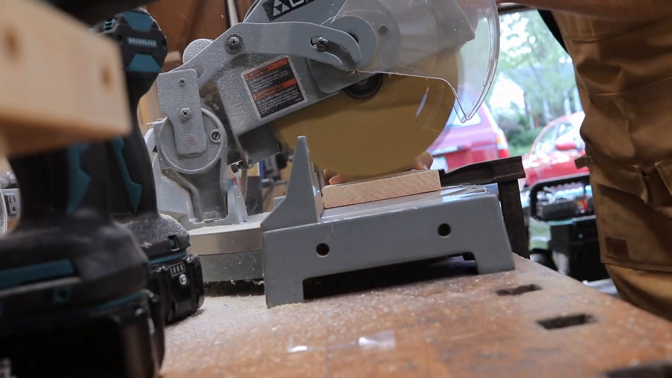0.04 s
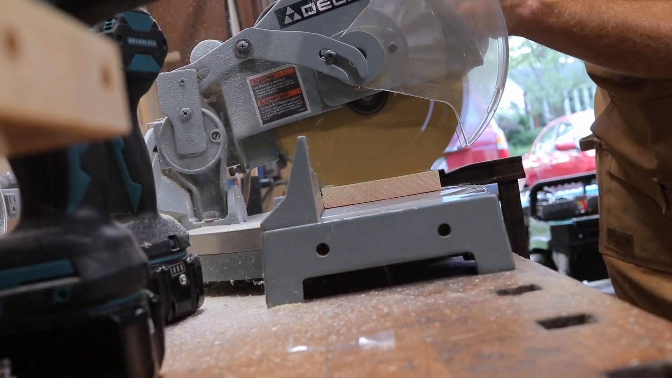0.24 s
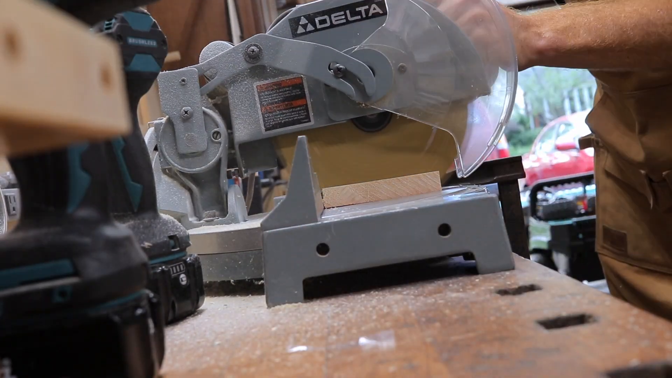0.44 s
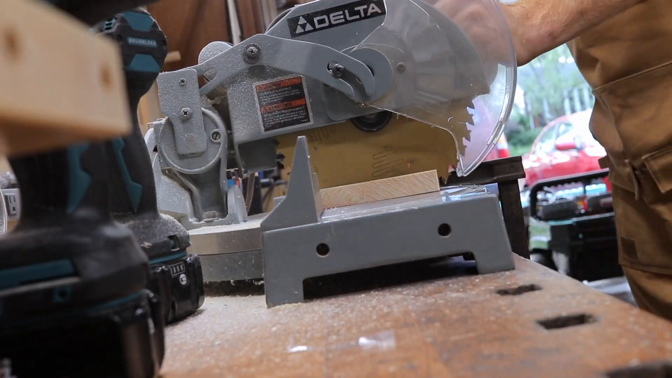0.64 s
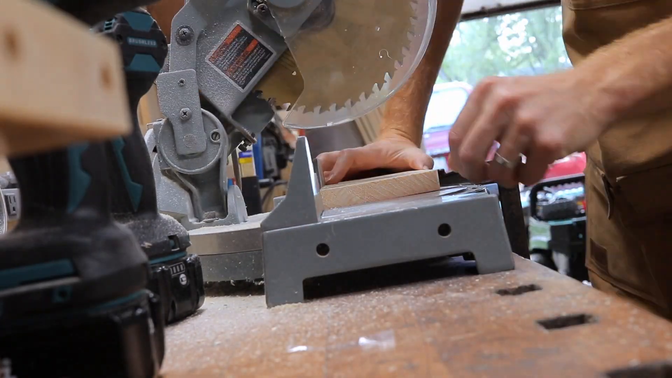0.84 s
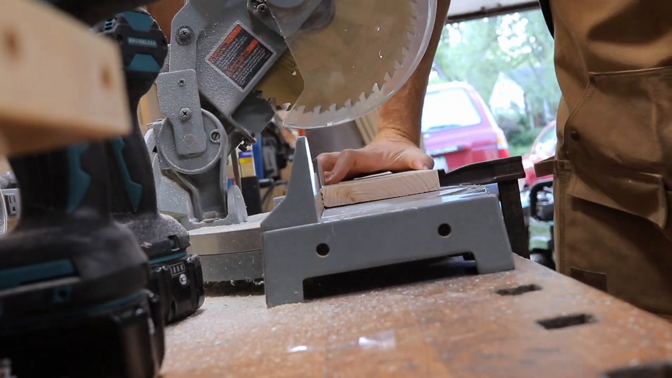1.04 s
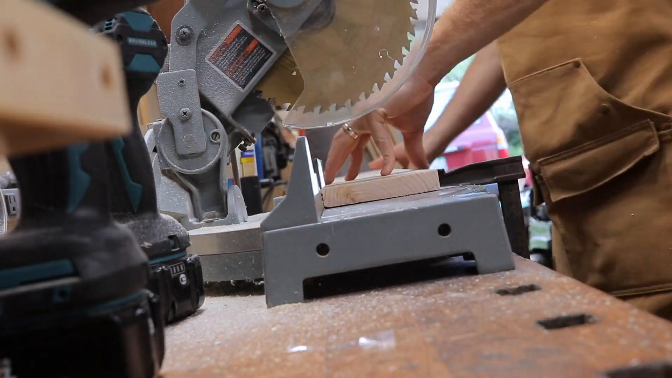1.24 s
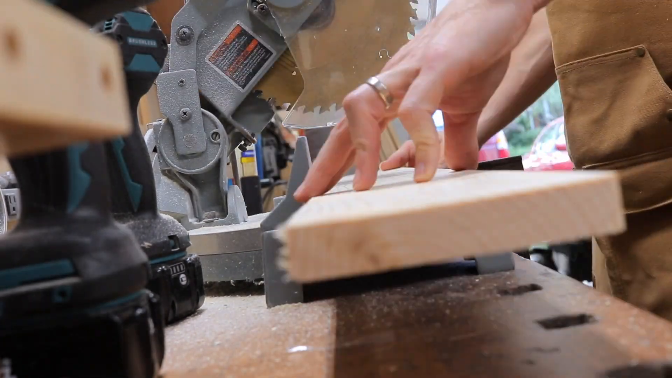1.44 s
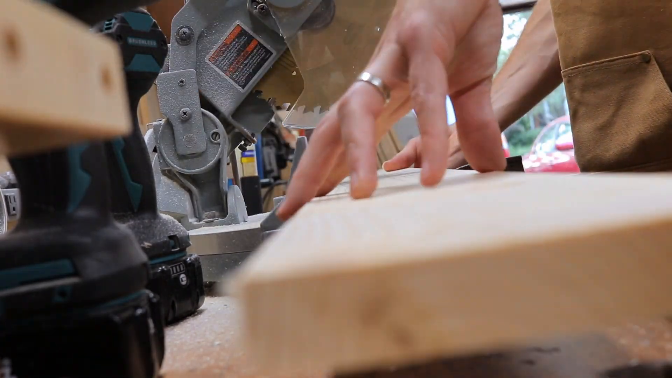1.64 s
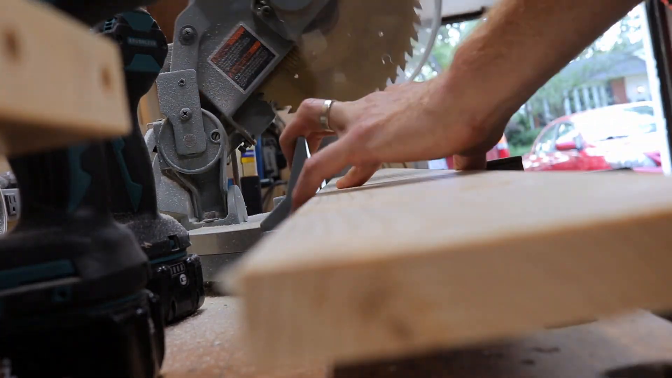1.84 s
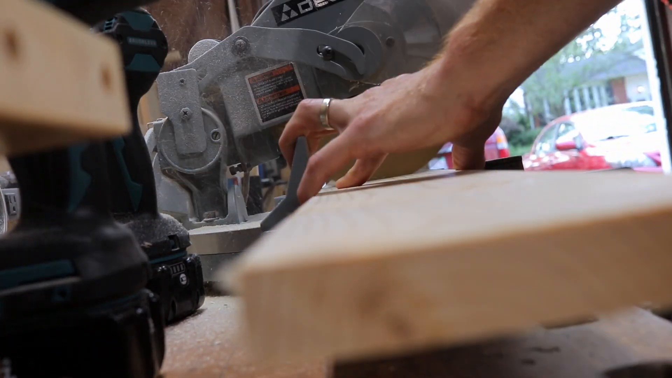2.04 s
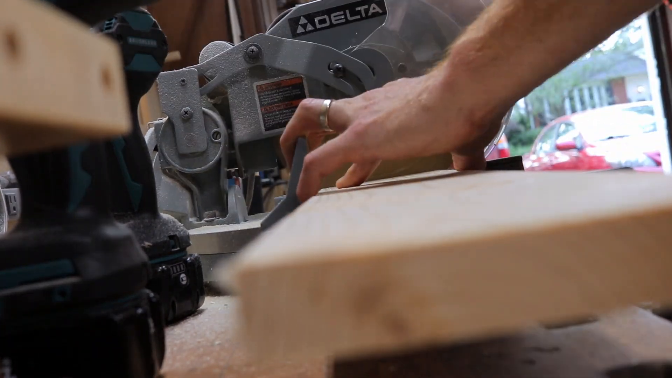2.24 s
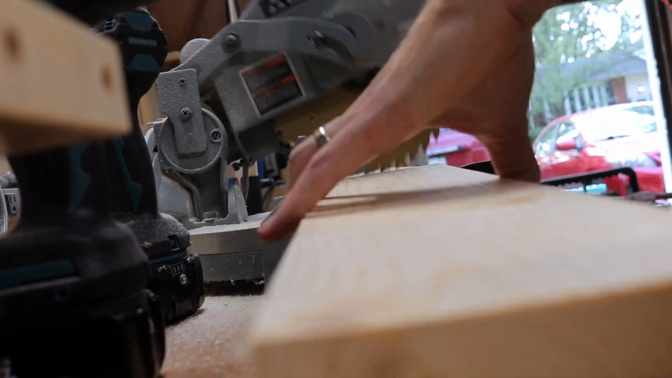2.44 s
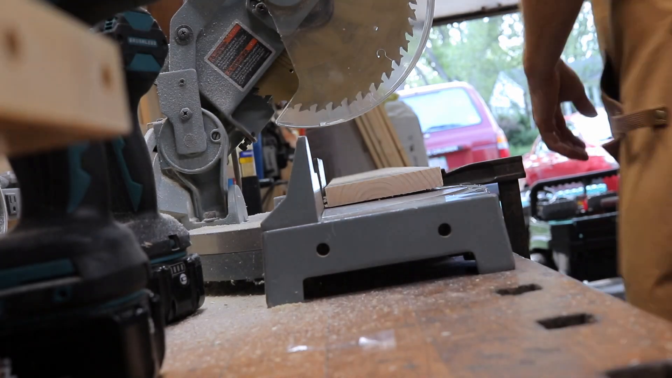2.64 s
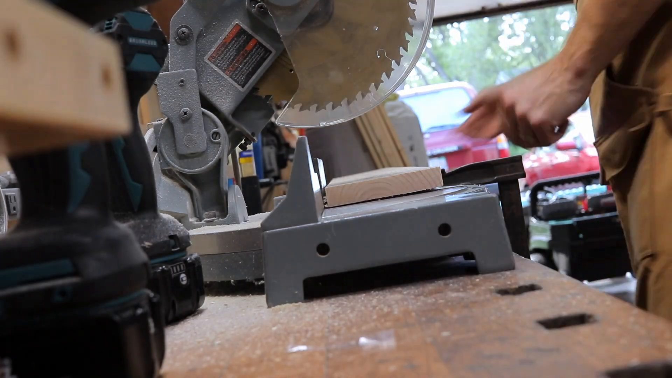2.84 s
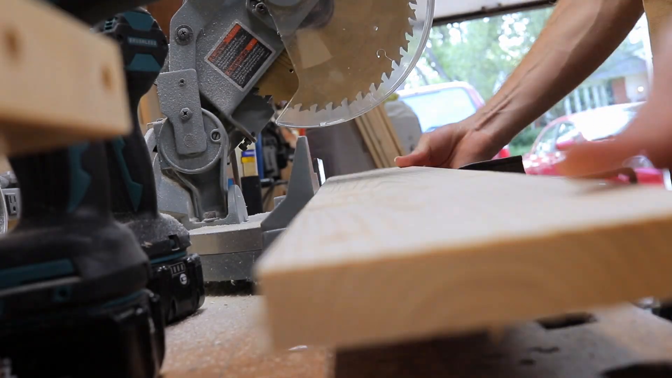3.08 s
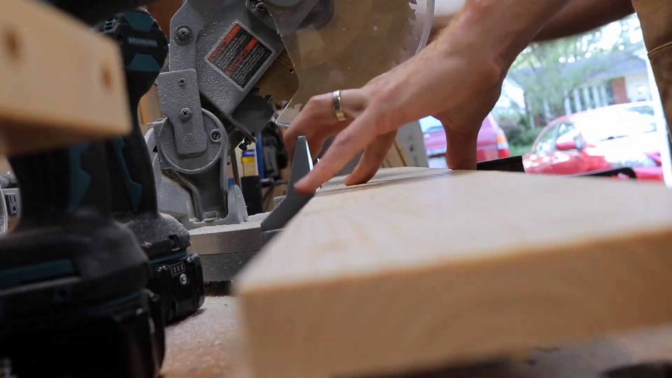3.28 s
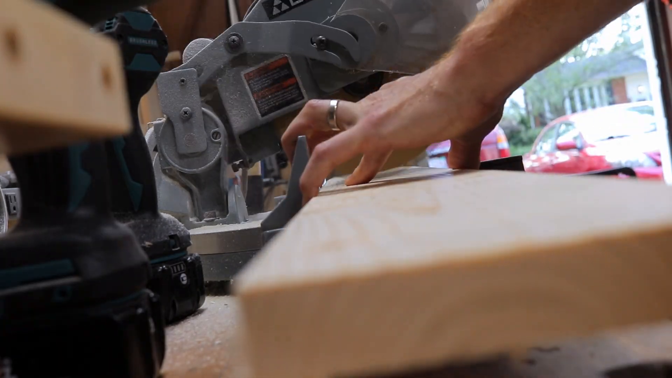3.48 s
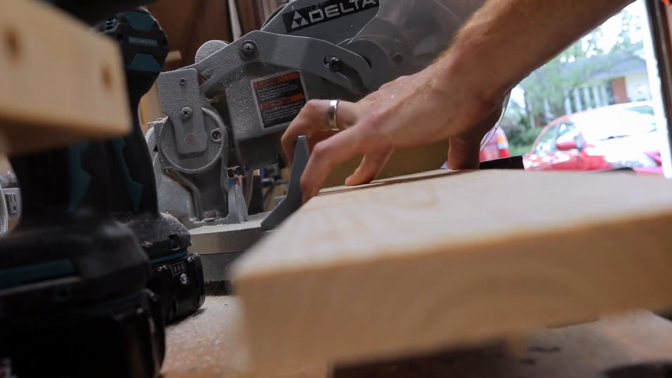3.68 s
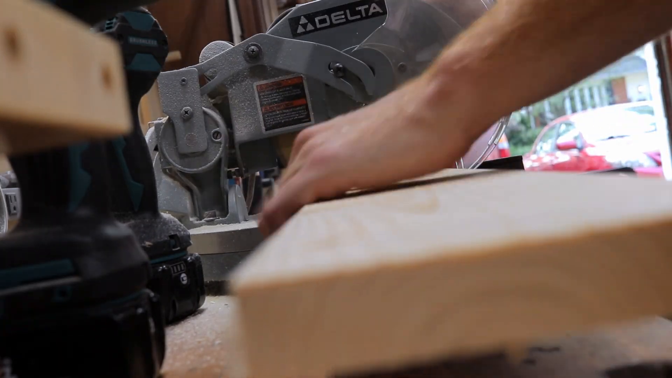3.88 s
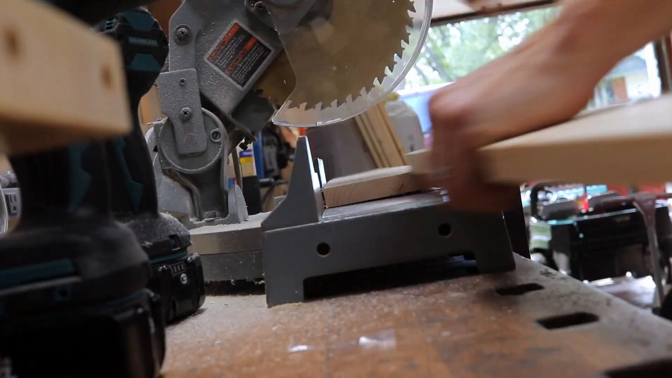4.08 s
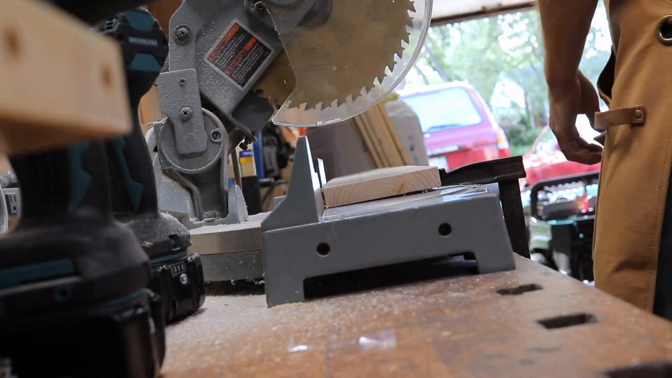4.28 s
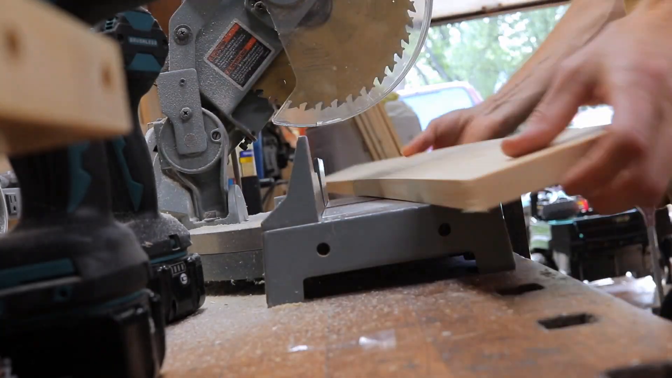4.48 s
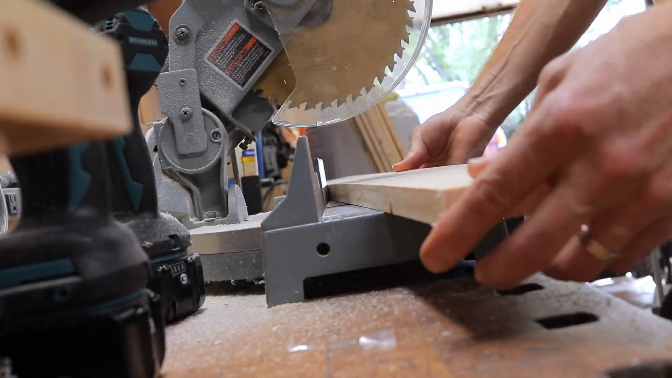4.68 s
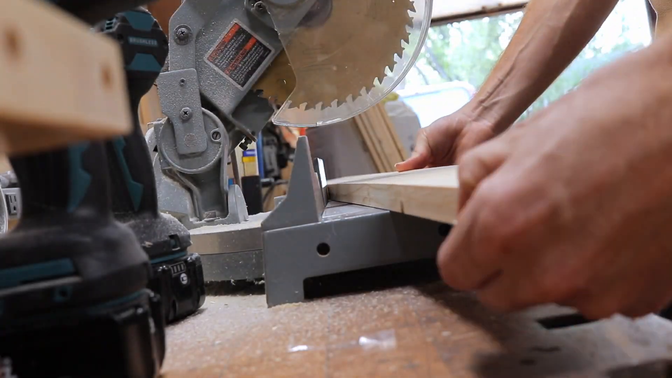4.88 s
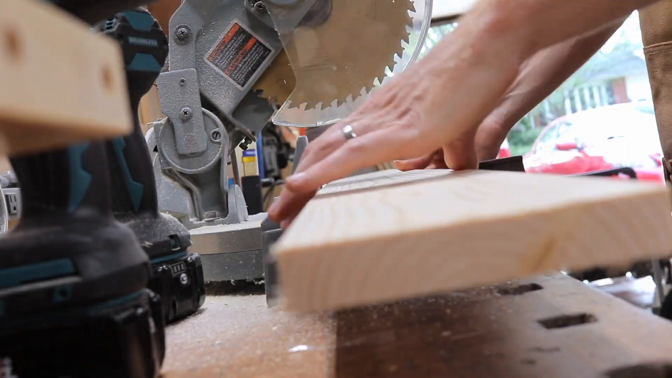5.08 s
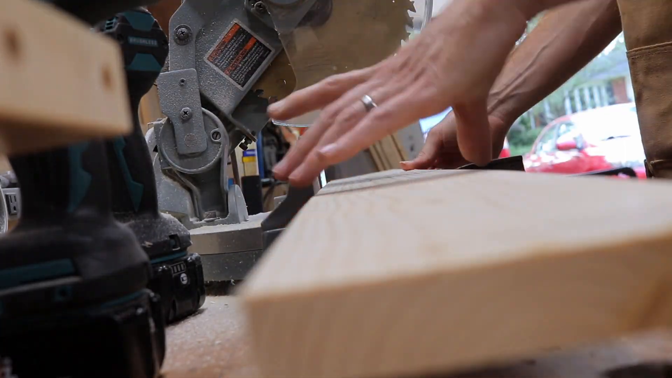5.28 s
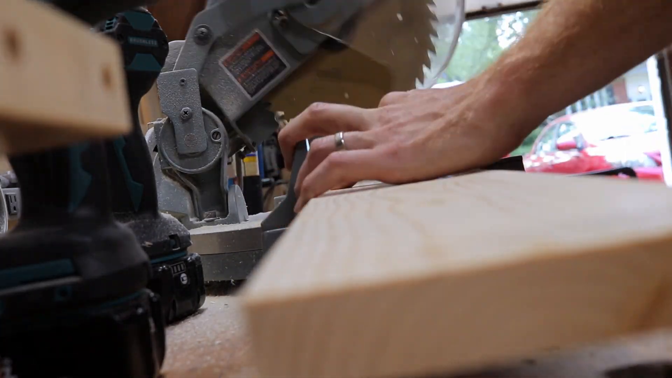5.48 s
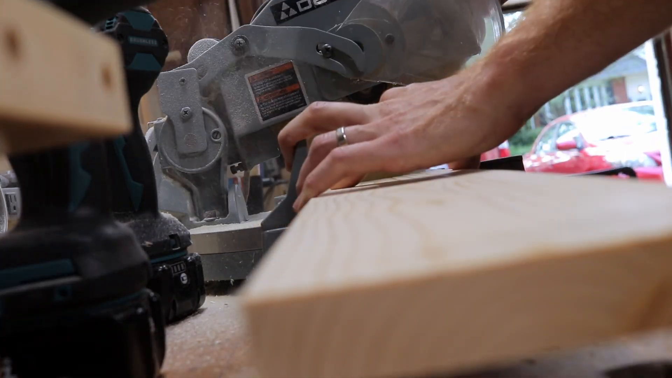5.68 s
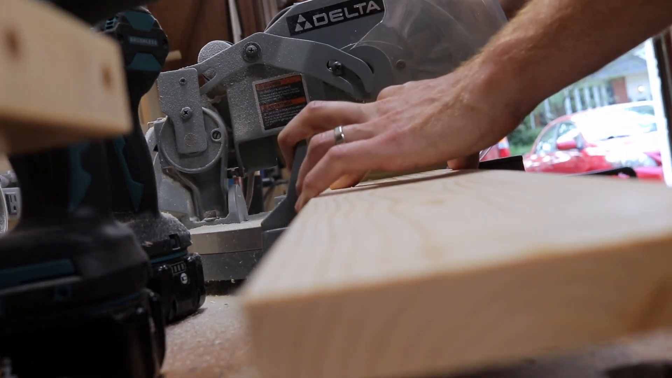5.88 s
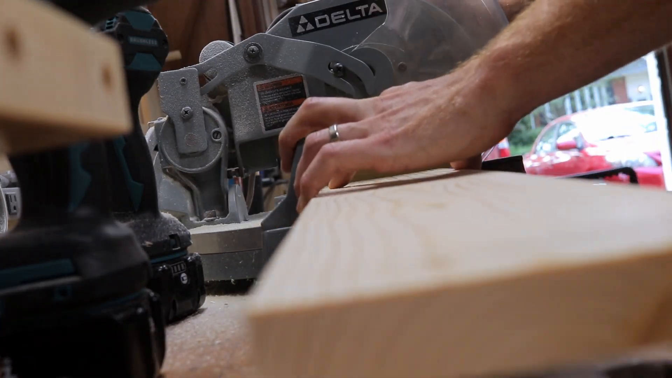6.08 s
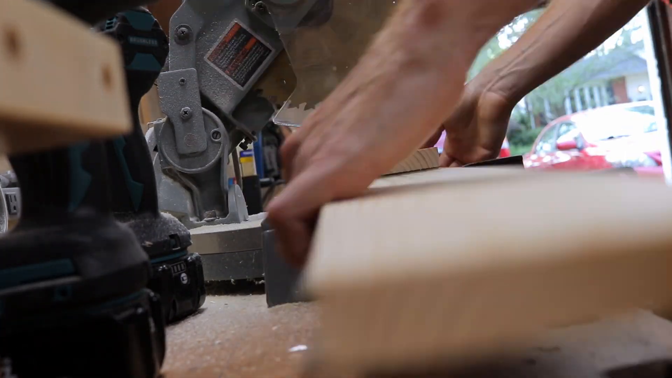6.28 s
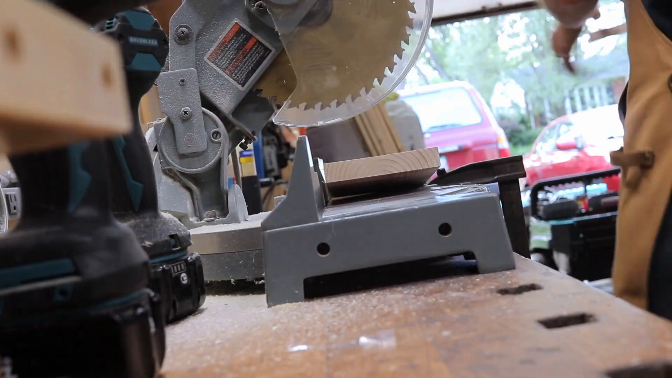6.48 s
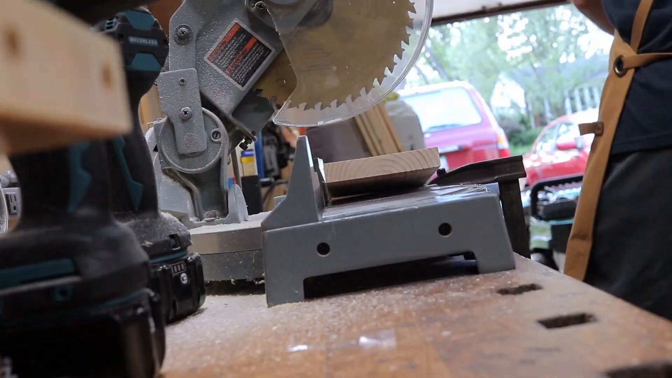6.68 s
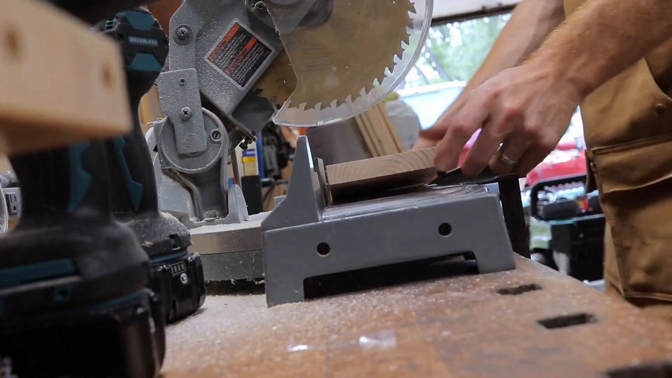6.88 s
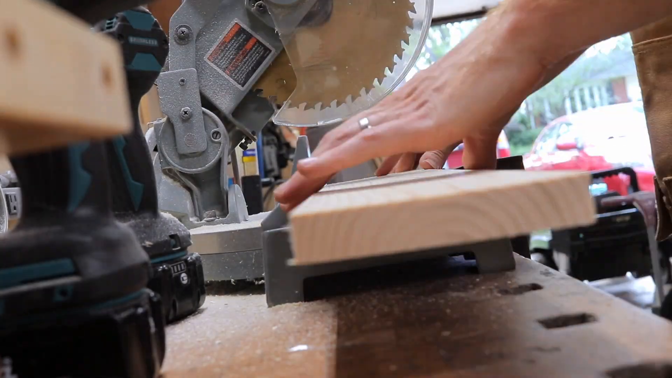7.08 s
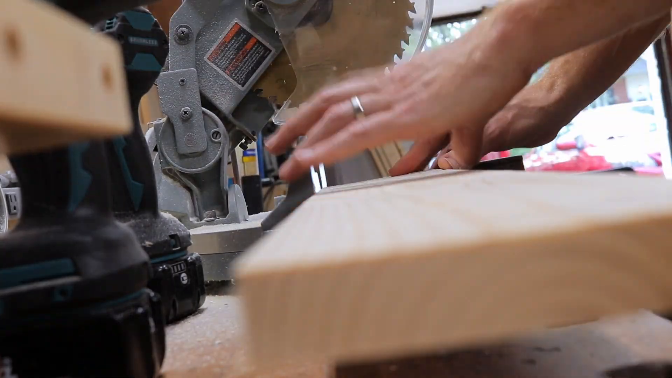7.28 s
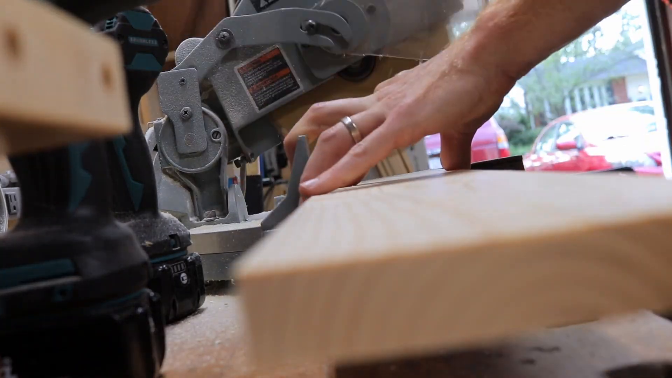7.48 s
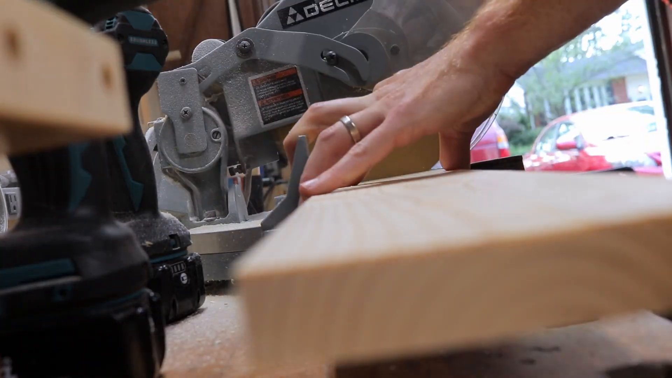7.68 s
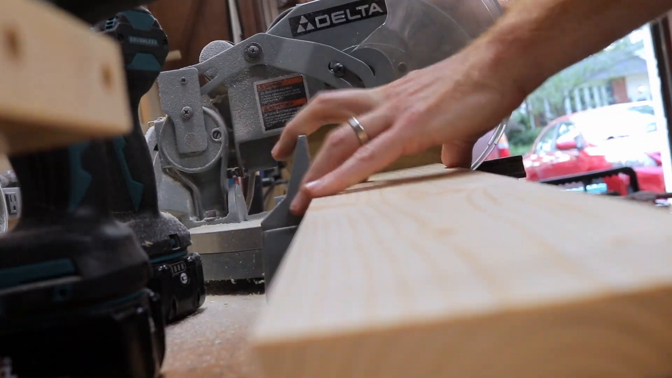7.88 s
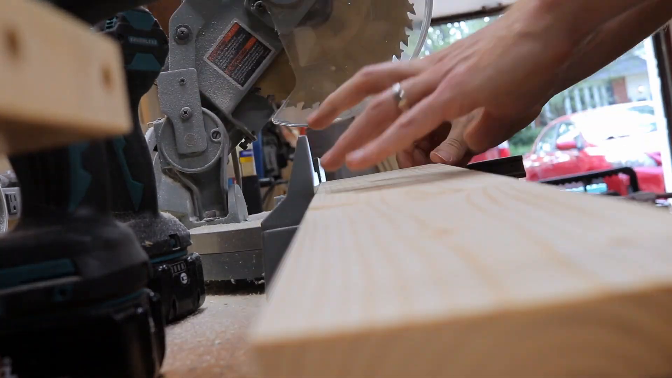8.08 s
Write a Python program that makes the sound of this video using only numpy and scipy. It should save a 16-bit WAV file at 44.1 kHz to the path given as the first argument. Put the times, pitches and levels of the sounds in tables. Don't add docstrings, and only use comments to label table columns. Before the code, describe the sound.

Close, dry workshop sound with a short room tail and a low, quiet machine hum. At 0 s a miter saw kicks in with an abrupt metallic slam; its whine rises, sags deeply in the wood around 0.3 s and recovers with a sharp splinter near 0.5. It coasts, then a brake growls from 0.8 and halts it at 1.2 with a sliding low note and tiny clunk. Board bumps come at 1.5-1.85. The second cut slams on at 1.9, braking to a stop at 3.0. The third, heavier and unevenly buzzing, starts at 3.4 and halts at 4.5. Boards knock and scuff at 4.9-5.5. The fourth snaps on at 5.55, lightly loaded and bright, stopping at 6.7. Busy knocks and slides fill 7.0-7.45. The fifth, brightest cut starts at 7.5, splinters near 7.87 and ends still coasting.

```python
import sys
import numpy as np
from scipy import signal
from scipy.io import wavfile
from scipy.ndimage import uniform_filter1d

SR = 44100
rng = np.random.default_rng(int(sys.argv[2]) if len(sys.argv) > 2 else 0)


def linear_from_db(decibels):
    return 10 ** (np.asarray(decibels, float) / 20)


def put_to_file(sound):
    columns = np.atleast_2d(sound).T
    safe = np.clip(columns, -1, 1)
    whole_steps = np.round(safe * 32767)
    wavfile.write(sys.argv[1], SR, whole_steps.astype(np.int16))


N = 358532
HANDOVER_S = 0.08


def evened(x):
    return x / np.sqrt(np.mean(x ** 2) + 1e-20)


def drifting(count, size):
    return evened(uniform_filter1d(rng.standard_normal(count), size=size))


def add(mix, start_s, sound):
    part = mix[round(start_s * SR):][:len(sound)]
    part += sound[:len(part)]


def lift_db(modes, hz):
    return sum(db / (1 + (2 * (hz - mode_hz) / width) ** 2) for mode_hz, width, db in modes)


def band(x, low_hz, high_hz):
    return signal.sosfilt(signal.butter(2, [low_hz, high_hz], "band", fs=SR, output="sos"), x)


def noise(spectrum, modes, splits_hz, patchy_db, flicker_db):
    frames, hz = N // 256 + 6, np.fft.rfftfreq(1024, 1 / SR)
    real, imaginary, patches = rng.standard_normal((frames, 513, 3)).T
    patches = uniform_filter1d(patches, size=8, axis=0)
    patches = evened(uniform_filter1d(patches, size=10, axis=1))
    point_hz, db = np.transpose(spectrum)
    colour_db = np.interp(np.log(hz + 1), np.log(point_hz + 1), db) + lift_db(modes, hz)
    z = (real + 1j * imaginary) * linear_from_db(colour_db[:, None] + patchy_db * patches)
    below = [0 * hz] + [1 / (1 + (hz / split) ** 8) for split in splits_hz] + [0 * hz + 1]
    shares = np.sqrt(np.maximum(np.diff(below, axis=0), 0))[:, :, None]
    parts = signal.istft(z * shares, nperseg=1024, noverlap=768)[1][:, :N]
    flicker = linear_from_db(flicker_db * drifting(N, 150))
    return [evened(part) * flicker for part in parts]


def played(tables, parts, rise_s, fall_s):
    out = np.zeros(N)
    for rows in tables:
        s, *levels = np.transpose(rows)
        t = np.arange(max(s[0] - rise_s, 0), s[-1] + fall_s, 1 / SR)
        nearest_edge = np.minimum((t - s[0]) / rise_s, (s[-1] - t) / fall_s)
        fade = np.sqrt(np.clip(nearest_edge + 1, 0, 1))
        start = round(t[0] * SR)
        for part, db in zip(parts, levels):
            piece = part[start:start + len(t)]
            envelope = fade * linear_from_db(np.interp(t, s, db))
            add(out, t[0], piece * envelope[:len(piece)])
    return out


def knock(thud_db, thud_hz, scuff_db, length_s):
    a, b, c = rng.standard_normal((3, 6000))
    u = np.arange(6000) / SR / length_s
    shape = np.clip(3 * u, 0, 1) * np.exp(-(1.3 * u) ** 2.5)
    tone = band(a, thud_hz * 0.75, thud_hz * 1.3)
    overtones = band(c, thud_hz * 1.3, thud_hz * 4.4)
    scuff = band(b, 800, 4000)
    tone, overtones, scuff = (v * np.linalg.norm(shape) / np.linalg.norm(v * shape)
                              for v in (tone, overtones, scuff))
    return shape * (linear_from_db(thud_db) * (tone + linear_from_db(-9) * overtones) + linear_from_db(scuff_db) * scuff)


# hz, level_db (per Hz)
SHOP_SPECTRUM = [(12, -42), (20, -13), (120, -0.5), (182, -10.5), (262, -6.5), (737, -12.5), (975, -9),
                 (2190, -24), (5070, -28), (12400, -52), (16000, -63)]
# hz, width_hz, lift_db
SHOP_MODES = [(119, 10, 9.5), (245, 28, 7.5), (1600, 300, 3.5)]


def shop_hum():
    return linear_from_db(-60.5) * noise(SHOP_SPECTRUM, SHOP_MODES, [], 1.6, 0.8)[0]


# start_s, level_db, pitch_hz, length_s
THUDS = [(.0005, -12, 712, .024), (0.337, -55, 65, .062), (1.675, -49, 55, 0.032), (2.237, -46, 60, .053),
         (3.034, -57, 70, 0.1), (3.825, -48, 65, 0.064), (4.098, -50, 70, 0.034), (4.557, -54, 50, .06),
         (5.308, -53, 60, .04), (6.947, -56, 91, 0.031), (7.3, -56, 70, .04), (7.488, -52, 50, 0.055)]


def thuds():
    out = np.zeros(N)
    for start_s, db, hz, length_s in THUDS:
        add(out, start_s, knock(db, hz, -81, length_s))
    return out


# start_s, level_db (rms), rise_s, hold_s, fall_s
KICKS = [
    (.001, -15.5, 0.0054, 0.005, 0.006),
    (1.901, -9.5, 0.019, 0.0066, .006),
    (3.418, -11.5, 0.015, 0.0077, 0.0095),
    (5.547, -10.5, 0.0015, 0.01, 0.0034),
    (7.48, -12.5, 0.018, 0.0061, 0.0099),
]
# pitch_hz, width_hz, level_db
KICK_MODES = [(752, 250, 2.5), (1580, 300, -1.5), (2960, 1200, -3), (4330, 990, -3.5), (450, 430, -20.5),
              (245, 100, -12.5), (8840, 1400, -15)]


def gear_kicks():
    out = np.zeros(N)
    t = np.arange(4000) / SR
    for start_s, db, rise_s, hold_s, fall_s in KICKS:
        rattle = rng.standard_normal(4000)
        for hz, width, mode_db in KICK_MODES:
            u = t * (hz / 2500) ** 0.15
            shape = np.clip(u / rise_s, 0, 1) ** 3 * np.exp(-np.maximum(u - rise_s - hold_s, 0) / fall_s)
            ring = evened(band(rattle, hz - width / 2, hz + width / 2))
            add(out, start_s, linear_from_db(db + mode_db - 6.5) * ring * shape)
    return out


def mains_buzz():
    hz = 120.6 * (1 + 0.026 * drifting(N, 3000))
    return np.sqrt(2) * np.sin(2 * np.pi * np.cumsum(hz) / SR)


def blade(on_s, deepest_s, slowest_hz, regained_s, late):
    start_hz, free_hz, spin_up_s, bite_s = 1500, 2945, 0.042, 0.1
    t = np.arange(on_s, regained_s, 0.002)
    free = free_hz - (free_hz - start_hz) * np.exp(-(t - on_s) / spin_up_s)
    dig = np.clip((t - on_s - bite_s) / (deepest_s - on_s - bite_s), 0, 1) ** late
    climb = np.clip((t - deepest_s) / (regained_s - deepest_s), 0, 1) ** 0.78
    sag = (free_hz - slowest_hz) * np.sin(np.pi / 2 * dig) ** 1.3 * np.cos(np.pi / 2 * climb) ** 2
    return t, free - sag, sag / 700


# hz, width_hz, lift_db
CASING = [(1235, 170, 14), (2650, 300, -1), (3200, 300, 7), (4100, 250, 5), (4850, 300, 4), (5380, 250, 7),
          (5870, 260, 15), (6250, 350, -13), (7050, 500, 7)]
TOOTH_MULTIPLES = [.5, 1, 2, 3, 3.5, 4, 5, 5.5, 6]
TOOTH_DB = [-19, -3, -2, -1, -13, -10, -14, -20, -20]
MOTOR_MULTIPLES = [1.11, 1.48, 2.215, 4.43]
MOTOR_DB = [-1, -5, -2, -19]


def whine(speed, rows, lean_db):
    s, *levels = np.transpose(rows)
    t = np.arange(speed[0][0], speed[-1][0], 1 / SR)
    tooth_db, motor_db = (np.interp(t, s, db) for db in levels)
    hz = np.interp(t, *np.transpose(speed))
    hz = uniform_filter1d(hz, size=700, mode="nearest")
    out = np.zeros(len(t))
    for multiples, sizes_db, level_db, wobble in ((TOOTH_MULTIPLES, TOOTH_DB, tooth_db, 0.003),
                                                  (MOTOR_MULTIPLES, MOTOR_DB, motor_db, 0.01)):
        for multiple, db in zip(multiples, sizes_db):
            waver, drift = (drifting(SR, 200)[:len(t)] for _ in range(2))
            waver, drift = evened(waver), evened(drift)
            line_hz = multiple * hz * (1 + wobble * drift)
            if multiple < 1:
                change_db = lean_db * (np.gradient(hz) < 0)
            else:
                change_db = 4.5 * waver
            size = linear_from_db(level_db + db + lift_db(CASING, line_hz) + change_db)
            out += size * (line_hz < 16000) * np.sin(2 * np.pi * np.cumsum(line_hz) / SR)
    echo = rng.standard_normal(6000) * linear_from_db(-60 * np.arange(6000) / SR / 0.1)
    echo *= linear_from_db(-6) / np.linalg.norm(echo)
    echo[0] = 1
    return signal.fftconvolve(out, echo)


BAND_DB = [-26.5, -32.5, -26.5, -30.5]
JOLT_DB, COLD_DB, SPLINTER_SHARE = [14.5, 16, 12.5, 6], [-2, -4, -4, -5.5], [0.2, 0.4, 0.81, 1.4]
LOAD_DB, DEPTH_DB = [3, 1.7, 1, 5.5], [0.1, 3.1, 1.2, 0.5]


def under_power(cut, out_s, splinter_db, let_go_s, hard_db, tooth_db, motor_db):
    t, hz, load = blade(*cut)
    u = t - t[0]
    dying = hard_db - 300 * np.maximum(t - let_go_s, 0)
    splinter = splinter_db * np.exp(-((t - out_s) / 0.01) ** 2)
    rush = [t]
    for db, jolt, cold, bite, deep, share in zip(BAND_DB, JOLT_DB, COLD_DB, LOAD_DB, DEPTH_DB, SPLINTER_SHARE):
        start = jolt * np.exp(-u / 0.012) + cold * np.exp(-u / 0.11)
        rush.append(db + start + bite * load + deep * u / u[-1] + share * splinter + dying)
    tooth = np.interp(u, [0, 0.13], [-56, -45]) + tooth_db + 15 * load + 2 * dying
    motor = motor_db - 29 - 8 * np.exp(-u / 0.03) - 3 * load + 2 * dying
    inrush = 25 * np.exp(-u / 0.05) * (1 - np.exp(-u / 0.01))
    hum = -57.5 + inrush + 12 * load + dying
    return np.transpose(rush)[u > 0.017], np.c_[t, hum], np.c_[t, hz], np.c_[t, tooth, motor]


# on_s, deepest_s, slowest_hz (teeth per s), regained_s, late (how late the feed presses)
CUTS = [
    (.003, .33, 2040, .52, 1.7),
    (1.915, 2.165, 2325, 2.32, 1),
    (3.432, 3.705, 2115, 3.88, 1),
    (5.55, 5.835, 2400, 6.06, 1.1),
    (7.495, 7.745, 2310, 7.93, .88),
]
# out_s (teeth break out), splinter_db, let_go_s (trigger), hardness_db
EXITS = [
    (.476, 6, .5, 0),
    (2.289, 2.5, 2.274, -0.5),
    (3.829, 2.5, 3.843, 0),
    (6.025, -0.5, 6.035, 0),
    (7.865, 5, 7.908, 0),
]
# tooth_db, motor_db, lean_db (uneven left-right bite on the way in)
SINGING = [
    (-6, -2, 0),
    (1, 1, 0),
    (-2, 1, 23),
    (3, 1, 0),
    (4, 2, 0),
]
# hz, level_db (per Hz)
ROAR = [(18, -60.5), (30, -23), (112, -13.5), (153, -22.5), (394, -7.5), (701, 0), (1390, -6.5), (1810, -4),
        (2230, -3.5), (3130, -0.5), (4530, -2.5), (5730, -6.5), (6370, -12), (7460, -12), (16000, -27.5)]
# hz, width_hz, lift_db
ROAR_MODES = [(245, 19, 15.5), (700, 160, 6), (1292, 34, 4), (1660, 230, 3.5), (3400, 130, 1),
              (5880, 75, 1.5)]


def sawing():
    out, rushes, hums = np.zeros(N), [], []
    for cut, end, (tooth_db, motor_db, lean_db) in zip(CUTS, EXITS, SINGING):
        rush, hum, speed, singing = under_power(cut, *end, tooth_db, motor_db)
        rushes.append(rush)
        hums.append(hum)
        add(out, speed[0][0], whine(speed, singing, lean_db))
    out += played(rushes, noise(ROAR, ROAR_MODES, [1150, 2400, 6500], 1.6, 0.8), 0.021, 0.0065)
    return out + played(hums, [mains_buzz()], 0.01, 0.041)


# bite_s, halt_s, growl_db, clunk_db (at the halt)
BRAKES = [
    (0.833, 1.167, -27, -48.5),
    (2.589, 2.98, -27.5, -47),
    (4.115, 4.538, -28.5, -50),
    (6.38, 6.723, -27.5, -50),
]
# hz, level_db (per Hz)
WHIR = [(18, -64.5), (30, -33.5), (95, -32), (259, -9), (473, -5.5), (648, -3.5), (1040, -8), (1250, -4),
        (1500, -8), (1810, -7.5), (2230, -7), (4900, -9), (16000, -33)]
# hz, width_hz, lift_db
WHIR_MODES = [(680, 160, 7), (1268, 100, 11.5), (1760, 200, 9), (2540, 170, 5.5), (3914, 460, 5),
              (9300, 1400, 5)]


def coasting():
    tables = []
    bites = [row[0] - HANDOVER_S for row in BRAKES] + [N / SR]
    for cut, bite_s in zip(CUTS, bites):
        off_s = cut[3]
        tables.append([(s, -27 - 7 * (s - off_s), -28 - 2 * (s - off_s)) for s in (off_s, bite_s)])
    return played(tables, noise(WHIR, WHIR_MODES, [2200], 0.76, 0.38), 0.033, HANDOVER_S)


# hz, level_db (per Hz)
GROWL = [(18, -92), (30, -63), (259, -9.5), (336, -12), (584, -5), (888, -19), (1250, -1), (1500, -17),
         (1810, -10), (2680, -11), (3130, -13), (5160, -9.5), (5890, -16.5), (9700, -19.5), (16000, -36.5)]
# hz, width_hz, lift_db
GROWL_MODES = [(641, 190, 8), (1200, 21, 3.5), (1278, 50, 10.5), (1653, 370, 9.5), (1829, 75, 14),
               (1983, 32, 6), (2220, 12, 3), (2340, 100, 4), (3157, 210, 10), (3760, 340, 5),
               (4216, 830, 7), (4750, 450, 4.5), (5200, 210, 6.5)]


def braking():
    tables = []
    for bite_s, halt_s, growl_db, _ in BRAKES:
        t = np.arange(bite_s, halt_s + 0.36, 0.004)
        u = np.maximum(t - halt_s, 0)
        groan = -35 + 6.5 * (t - u - bite_s)
        groan += -9 * np.minimum(u / 0.04, 1) - 247 * np.maximum(u - 0.08, 0)
        tables.append(np.c_[t, groan, growl_db - 310 * u, -26.5 - 260 * u])
    return played(tables, noise(GROWL, GROWL_MODES, [950, 2250], 0.59, 0.32), HANDOVER_S, 0.03)


def last_turns():
    out = np.zeros(N)
    u = np.arange(0, 1, 1 / SR / 0.2)
    slide_hz = 650 * (155 / 650) ** u
    for _, halt_s, _, clunk_db in BRAKES:
        turns = np.cumsum(slide_hz * (1 + 0.043 * drifting(9000, 200)[:len(u)])) / SR
        note = np.sin(2 * np.pi * turns)
        note += 0.5 * u * np.sin(6 * np.pi * turns)
        note += 0.6 * u ** 4 * np.sin(9.6 * np.pi * turns)
        add(out, halt_s - 0.035, linear_from_db(clunk_db + 12 - 18 * u) * np.sqrt(np.sin(np.pi * u)) * note)
        add(out, halt_s + 0.083, knock(clunk_db, 230.8, -78, 0.047))
    return out


def room_echo():
    tables = [[(row[1] + u, -42 - 96 * u, -35.5 - 147 * u) for u in (0, 0.36)] for row in BRAKES]
    return played(tables, noise(WHIR[2:], [], [2200], 1.5, 0.5), 0.027, 0.03)


# start_s, thud_db, pitch_hz, scuff_db, length_s
KNOCKS = [(1.487, -54, 307, -76.5, .035), (1.622, -71.5, 201, -66, .018), (1.675, -46, 108, -70, 0.018),
          (1.752, -49, 302, -66, 0.016), (1.856, -69, 130, -70.5, 0.021), (3.233, -59, 200, -64, .017),
          (4.944, -48.5, 280, -53.5, 0.016), (5.063, -45, 380, -55, .019),
          (5.231, -57.5, 300, -68.5, 0.043), (5.285, -56, 200, -74, .025), (5.406, -51, 790, -76, 0.032),
          (5.502, -58, 680, -58, 0.022), (5.531, -48, 747, -59, .041), (6.989, -42.5, 520, -51.5, 0.021),
          (7.006, -52, 204, -59, 0.054), (7.052, -46, 420, -72, 0.028), (7.069, -60, 300, -57.5, 0.068),
          (7.143, -61, 504, -56.5, 0.046), (7.197, -62, 403, -62, 0.038), (7.257, -65, 397, -68.5, .036),
          (7.296, -51, 245, -71, .022), (7.354, -70, 500, -58.5, .02), (7.39, -69, 400, -72, .028),
          (7.468, -68, 700, -59, .03)]


def board_knocks():
    out = np.zeros(N)
    for start_s, *board in KNOCKS:
        add(out, start_s, knock(*board))
    return out


def scene():
    mix = shop_hum() + thuds() + gear_kicks() + sawing()
    mix += coasting() + braking() + last_turns() + room_echo()
    mix += board_knocks()
    return np.array([mix, mix])


def low_pass(x):
    return signal.sosfilt(signal.butter(12, 16120, fs=SR, output="sos"), x)


def record(dry):
    return low_pass(dry)


dry = scene()
out = record(dry)
put_to_file(out)
```